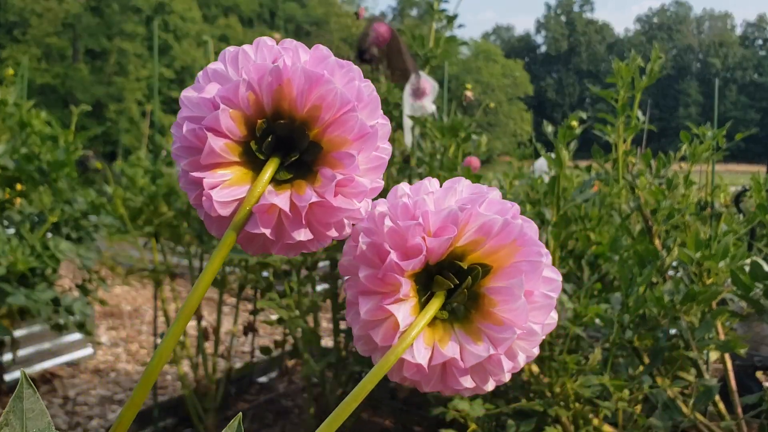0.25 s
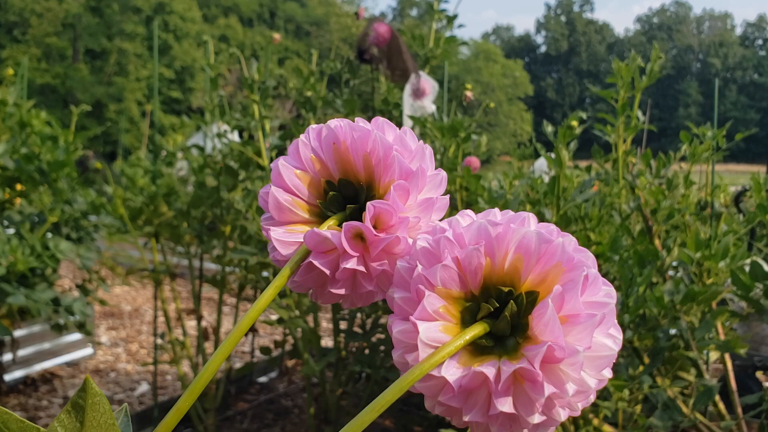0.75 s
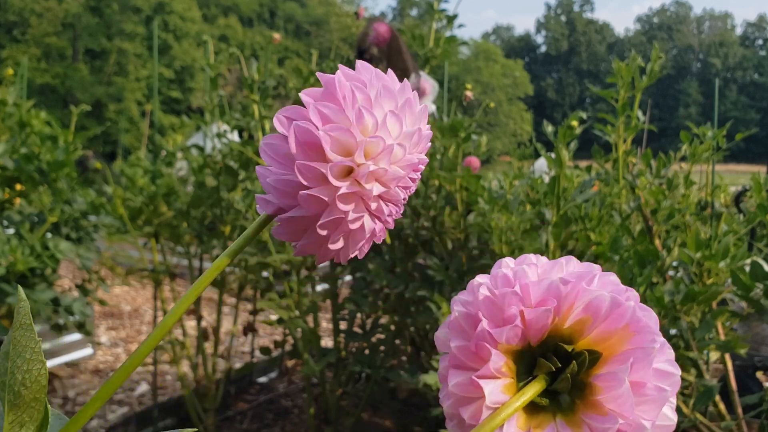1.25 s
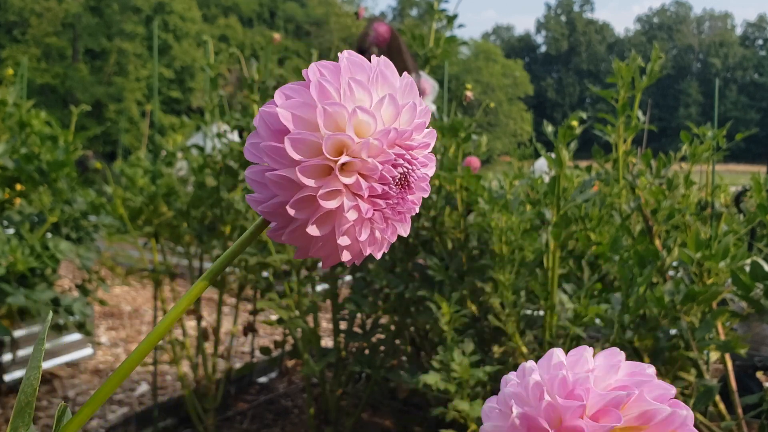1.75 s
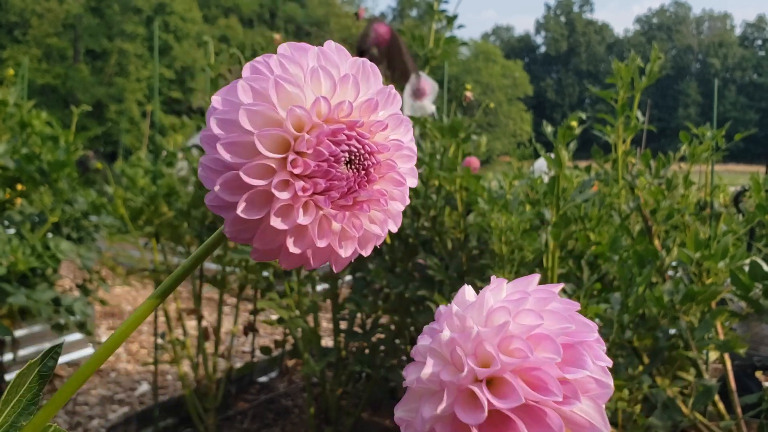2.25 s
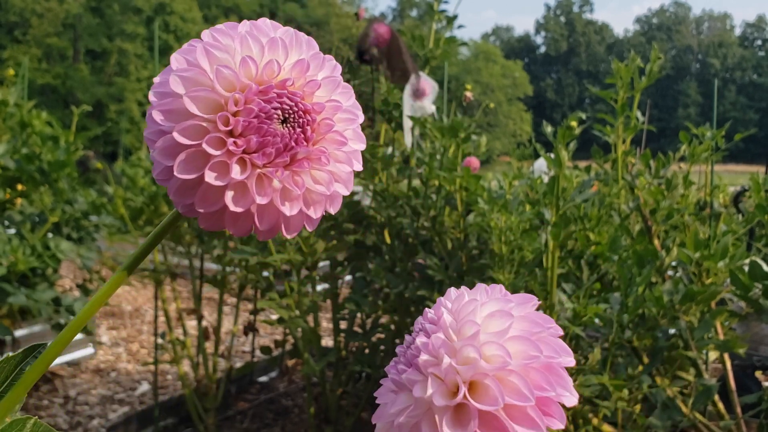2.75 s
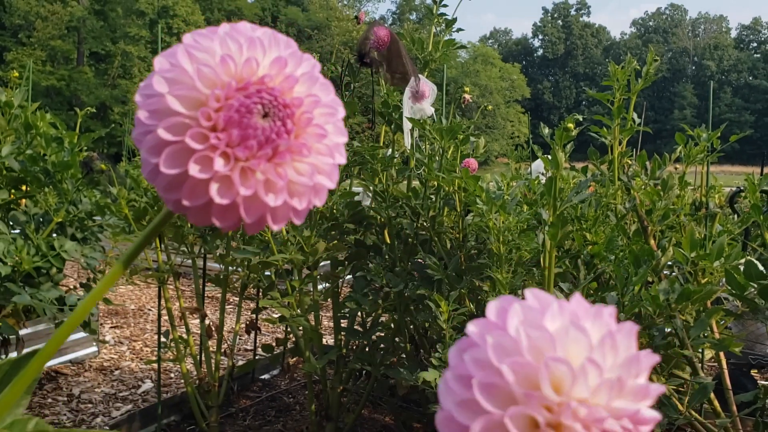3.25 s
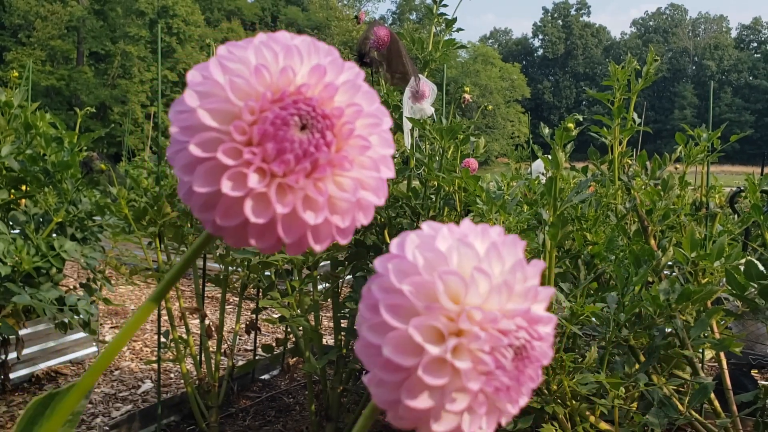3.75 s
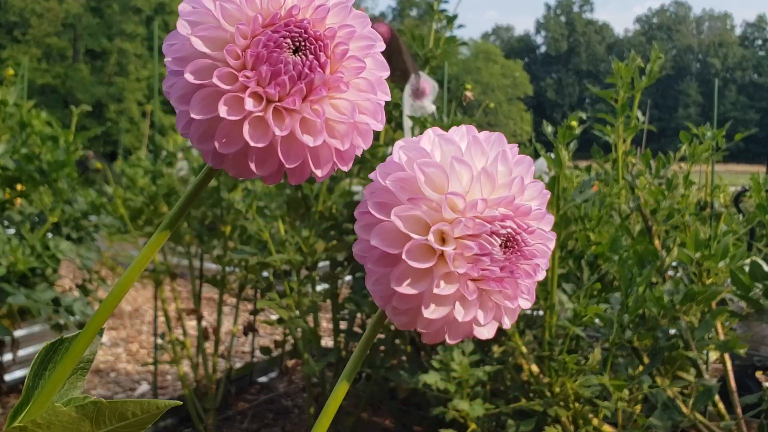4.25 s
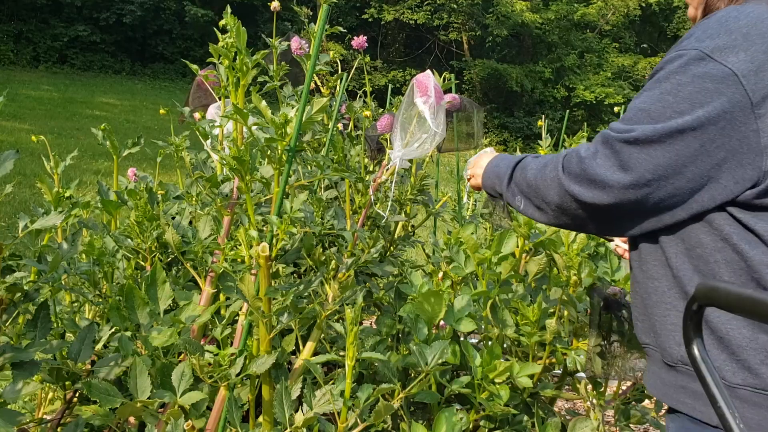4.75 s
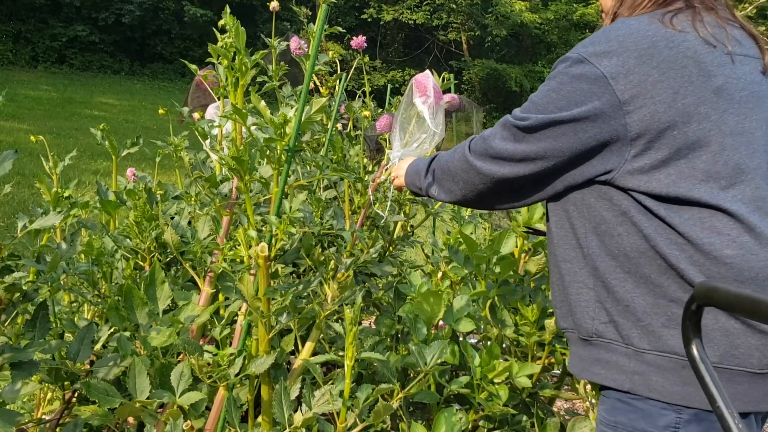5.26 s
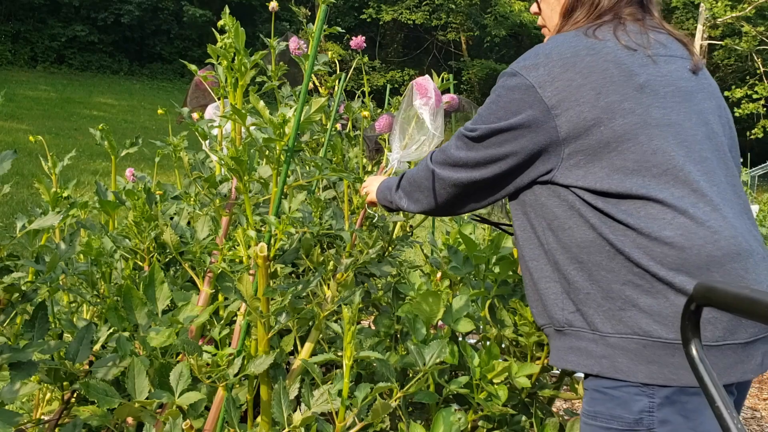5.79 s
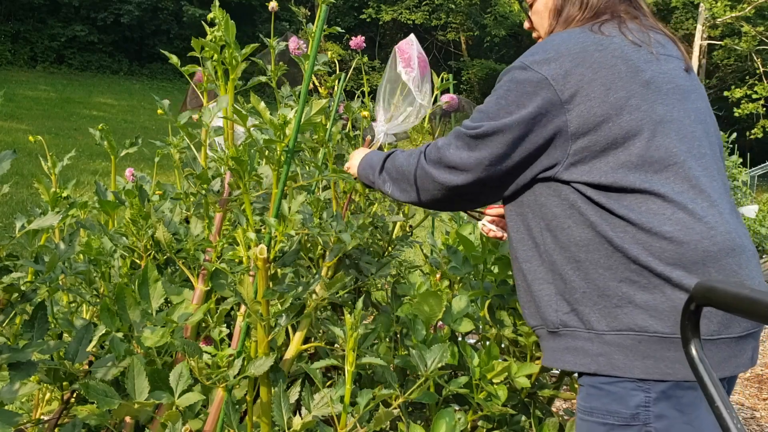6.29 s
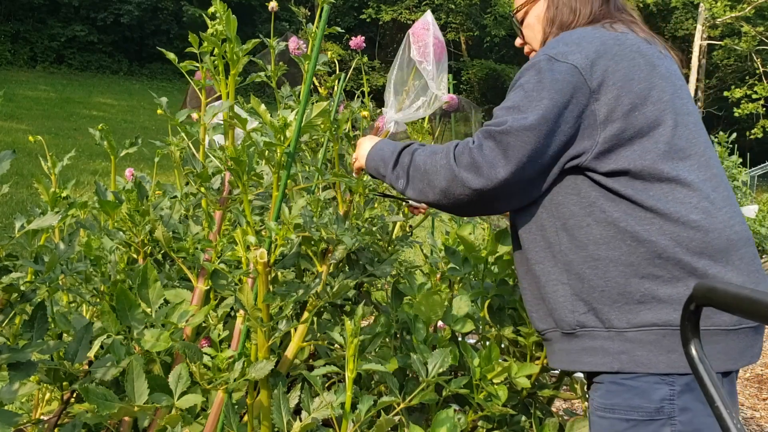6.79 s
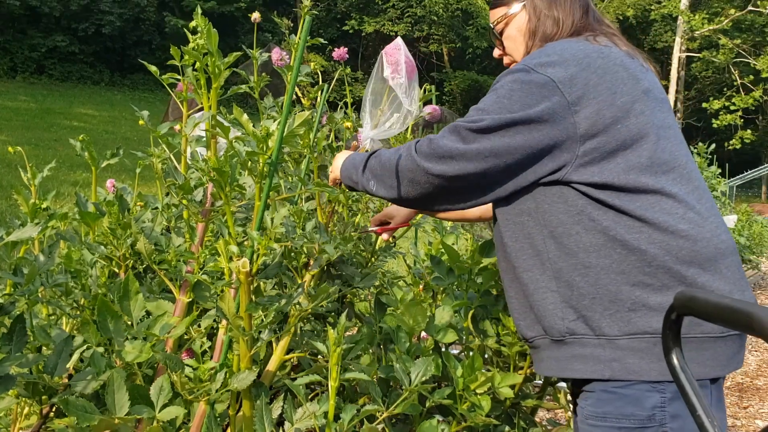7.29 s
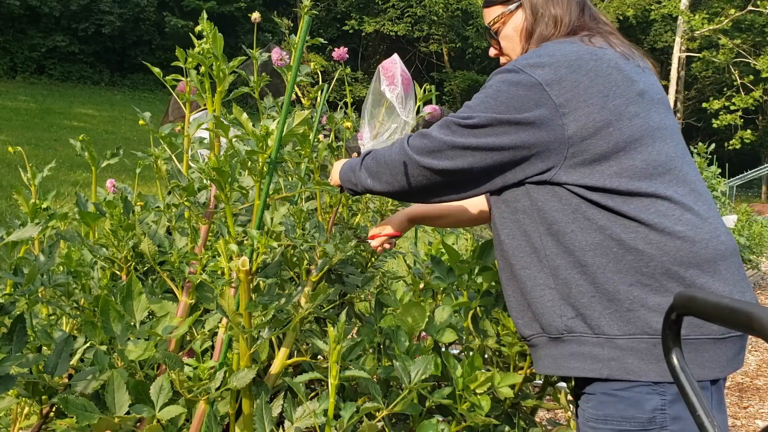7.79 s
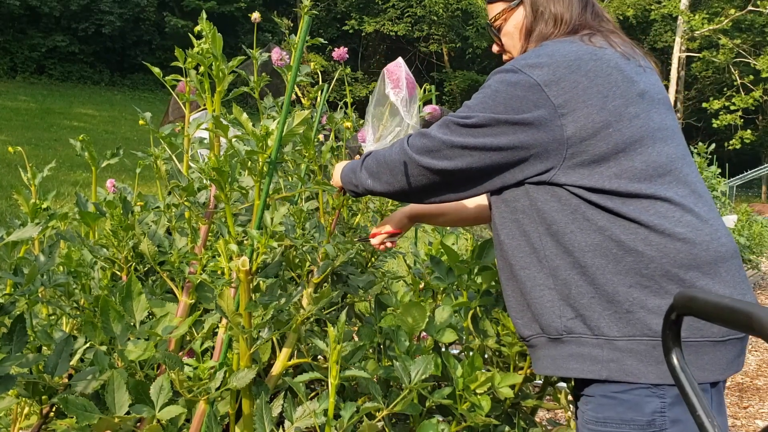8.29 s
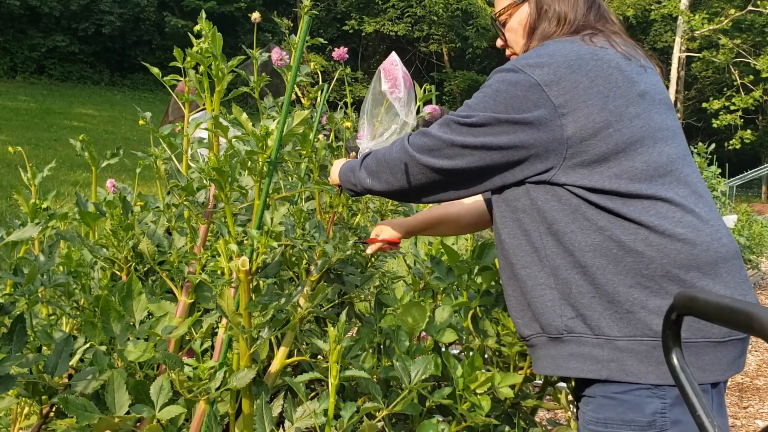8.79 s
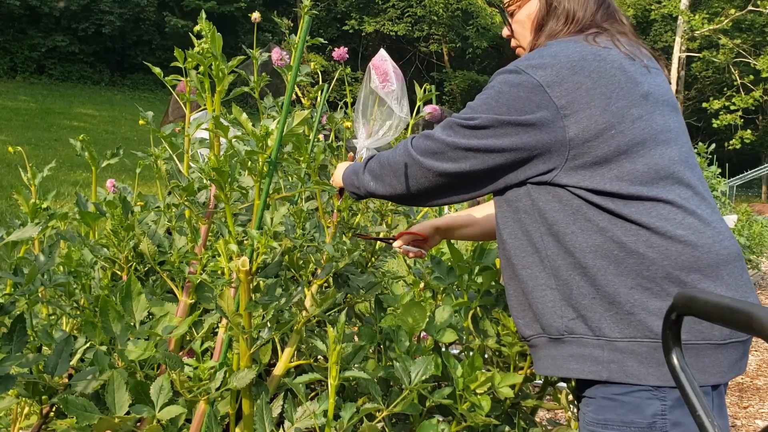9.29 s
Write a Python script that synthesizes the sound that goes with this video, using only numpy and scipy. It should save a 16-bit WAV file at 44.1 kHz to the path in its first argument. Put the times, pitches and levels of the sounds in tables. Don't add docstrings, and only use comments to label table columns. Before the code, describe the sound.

Summer garden insects trill and hiss above distant traffic; the scene shifts midway, and near the end shears cut a stem with a sharp metallic snap.

```python
import sys
import numpy as np
from scipy import signal
from scipy.fft import rfft, irfft
from scipy.io import wavfile
from scipy.ndimage import uniform_filter1d

SR = 44100
rng = np.random.default_rng(int(sys.argv[2]) if len(sys.argv) > 2 else 0)


def master(y):
    cut = np.clip(np.atleast_2d(y).T, -1, 1)
    pcm = np.round(cut * 32767)
    wavfile.write(sys.argv[1], SR, pcm.astype(np.int16))


def boost(x):
    u = np.asarray(x, float) / 20
    return 10 ** u


N = 420713
T = np.arange(N) / SR


def track(rows):
    s, *columns = np.transpose(rows)
    curves = [np.interp(T, s, c) for c in columns]
    gate = np.clip(np.minimum(T - s[0], s[-1] - T) / 0.064 + 1, 0, 1)
    return curves, gate


def on_hz(points, hz):
    f, db = np.transpose(points)
    return np.interp(np.log(hz + 1e-9), np.log(f), db)


def walk(rate):
    k = int(SR / rate)
    held = np.repeat(rng.standard_normal(N // k + 1), k)
    return 1.3 * uniform_filter1d(uniform_filter1d(held, k), k)[:N]


def colour(x, points, side=((1, 0), (2, 0)), lean=((1, 0), (2, 0))):
    hz = np.fft.rfftfreq(x.shape[1], 1 / SR)
    inside = (hz > points[0][0]) * (hz < points[-1][0])
    gain = boost(on_hz(points, hz)) * inside
    mid, sid = rfft(x) * [gain, gain * boost(on_hz(side, hz))]
    tilt = boost(on_hz(lean, hz) / 2)
    stereo = irfft([(mid + sid) * tilt, (mid - sid) / tilt], x.shape[1])
    return stereo / irfft(mid, x.shape[1]).std()


def noise():
    return rng.standard_normal((2, N))


def lean_gain(db):
    return boost(np.array([[db], [-db]]) / 2)


# f/Hz, level/dB (per Hz)
RUMBLE = [
    [(12, -60), (20, -4), (25, -14), (35, -2.5), (70, 0.5), (88, 0), (155, -12), (193, -14.5), (244, -33),
     (260, -27.5), (340, -53), (570, -120)],
    [(12, -55), (20, -25), (54, -0.5), (102, -4), (134, -4.5), (146, -4), (167, -13), (197, -16),
     (239, -30), (260, -18), (340, -34), (570, -120)],
]
DRONE = [
    [(120, -35), (200, -3), (243, -7.5), (327, -9.5), (399, -19), (620, -22.5), (810, -50), (1360, -120)],
    [(120, -29), (200, 2.5), (243, -13.5), (394, -2.5), (499, -3.5), (620, -6.5), (810, -45), (1360, -120)],
]
ROAD = [
    [(360, -38), (620, -14), (769, -2), (1000, -2), (1500, -5.5), (2100, -14), (2600, -23), (3380, -26),
     (5720, -120)],
    [(360, -25), (620, 0), (932, -1.5), (1600, -15), (1760, -16.5), (1960, -24.5), (2210, -22.5),
     (2600, -31.5), (3380, -33), (5720, -120)],
]
LOW_INSECTS = [
    [(1350, -67), (2300, -57), (2820, -22), (3190, -15), (3500, -3), (4500, 3), (5850, -9.5), (9900, -120)],
    [(1350, 0), (2300, 1), (2540, -12.5), (3140, -11.5), (3690, -1), (4500, 4), (5850, -31), (9900, -120)],
]
CROWD = [
    [(2470, -34.5), (4200, -8), (4770, 1.5), (5180, -0.5), (5610, 0.5), (5870, 1), (7660, -8),
     (8260, -31.5), (9200, -26.5), (12000, -38), (20200, -120)],
    [(3700, -56), (4050, -33), (4400, -4.5), (4880, 3.5), (5350, -2), (5990, -0.5), (7900, -8), (8200, -30),
     (8350, -30), (8500, -56)],
]
KATYDIDS = [
    [(5060, -32), (8600, -24), (9440, 0), (11000, -3.5), (12000, 0), (14200, 0.5), (15200, 5), (16000, 7)],
    [(8800, -17), (9550, -25), (9750, -6), (10100, -7), (14000, -0.5), (15100, 5.5), (16000, 3)],
]
# f/Hz, level/dB (side minus mid)
SIDE_DB = [
    [(60, -21), (110, -18.5), (200, -15), (380, -5.5), (700, 0), (1290, 0.5), (2380, -14.5), (4400, 2.5),
     (8120, -0.5), (15000, -0.5)],
    [(60, -25.5), (200, -15.5), (380, -10.5), (700, -3.5), (1290, 0.5), (15000, -0.5)],
]
# f/Hz, level/dB (left minus right)
LEAN_DB = [
    [(60, 0), (380, 2.5), (700, -1), (1300, 2.5), (4400, -2), (7600, 10), (8400, 39.5), (9400, 16.5),
     (10500, 10), (15000, -8)],
    [(60, 0.5), (700, .5), (2400, 2.5), (6000, 1), (7700, 10.5), (8300, 15), (9700, 6.5), (15000, -0.5)],
]
# t/s, level/dB
TRAFFIC = [
    [(0, -1.5), (.6, 0), (1.5, -0.5), (2.2, 1.5), (3.3, 1), (4.74, 2)],
    [(4.79, 3), (5.6, 1.5), (6.7, 0.5), (7.4, -0.5), (7.95, -1), (8.5, -2.5), (9.0, -4), (9.54, -5)],
]
# t/s, level/dB
CHORUS = [
    [(0, 3.5), (.7, 3), (1.5, 1.5), (2.8, -1.5), (4.74, -3.5)],
    [(4.79, 4), (5.3, 1), (6.5, -0.5), (7.6, -2.5), (8.2, -1.5), (9.54, -.6)],
]
# level/dB (mean), dB per dB of the driver
LAYERS = [
    [(-51, 1.6), (-68, 0.55), (-62, 1.26), (-64, 1.22), (-54.5, 0.85), (-72.5, 0.8)],
    [(-49.5, .5), (-57.5, 1.54), (-55, 1.03), (-69, 1.83), (-61.5, 0.88), (-74.5, 1)],
]
# left lag [samples], level/dB (side trim)
ROAD_SIDE = [
    (-12, -3),
    (4, -1.5),
]


def air(spot):
    flicker_db, flicker_hz = (1.5, 1.2, .8, 1.1, .8, .8), (6, 5, 8, 14, 30, 25)
    (traffic,), _ = track(TRAFFIC[spot])
    (chorus,), _ = track(CHORUS[spot])
    hush = -10.5 * np.clip((T - 6.7) / .15 + .5, 0, 1)
    car = 3.5 * np.exp(-((T - 8.0) / .3) ** 2)
    out = 0
    for k, points in enumerate((RUMBLE, DRONE, ROAD, LOW_INSECTS, CROWD, KATYDIDS)):
        lag, trim_db = ROAD_SIDE[spot] if points is ROAD else (0, 0)
        source = noise() * [[1], [boost(trim_db)]]
        bed = colour(source, points[spot], SIDE_DB[spot], LEAN_DB[spot])
        bed[0] = np.roll(bed[0], lag)
        mean_db, share = LAYERS[spot][k]
        db = mean_db + share * (traffic if k < 3 else chorus)
        if points is LOW_INSECTS:
            db = db + hush
        if points is ROAD:
            db = db + car
        out = out + bed * boost(db + flicker_db[k] * walk(flicker_hz[k]))
    return out


def tone(rows, wander, rate, flutter_db, trim_db):
    (hz, db), gate = track(rows)
    level = gate * boost(db + trim_db + flutter_db * walk(rate))
    pitch = hz * (1 + wander * walk(rate))
    return level * np.sin(2 * np.pi * np.cumsum(pitch) / SR)


# t/s, f/Hz, level/dB
HUM = [
    [(2.85, 78.8, -61), (3.45, 77.4, -40), (3.65, 76.35, -51.5), (4.6, 73.5, -48.5), (4.74, 74, -60)],
    [(4.79, 136.7, -46), (5.2, 134.5, -46), (5.9, 134.3, -50.5), (6.6, 135.7, -59.5), (7.5, 131.7, -57),
     (8.0, 133.9, -64), (8.5, 135.1, -56), (9.15, 136, -46), (9.54, 138, -72)],
]


def engine_hum(spot):
    if spot == 0:
        return tone(HUM[0], wander=.0264, rate=7.3, flutter_db=2.9, trim_db=-1.0)
    return tone(HUM[1], wander=.0295, rate=9, flutter_db=5.0, trim_db=-1.2)


# t/s, f/Hz, level/dB
WHINE = [
    (4.79, 2220, -79),
    (5.29, 2225, -63.5),
    (5.318, 2150, -73),
    (6.294, 2147, -66.5),
    (6.5, 2140, -79),
]


def tyre_whine():
    return sum(tone(WHINE, wander=.014, rate=260, flutter_db=1.3, trim_db=-6.5) for _ in range(3))


# t/s, f/Hz, level/dB
BIRD = [
    (1.31, 2510, -80),
    (1.36, 2540, -75),
    (1.42, 2545, -72),
    (1.445, 2550, -84),
    (1.47, 2560, -71),
    (1.52, 2530, -80),
]


def bird():
    return tone(BIRD, wander=.003, rate=40.2, flutter_db=1.5, trim_db=0)


def cracks(events):
    out = 0
    for s, db, t60 in events:
        attack = np.clip((T - s) / 0.00047, 0, 1)
        out = out + attack * boost(db - 60 * np.maximum(T - s, 0) / t60)
    return out


# t/s, level/dB (peak), t60 [s]
LEAF = [
    (1.088, -56, .06),
    (3.125, -62, .04),
]
# f/Hz, level/dB (per Hz)
LEAF_COLOUR = [(6000, -30), (9000, 0), (12000, -1), (15500, -12)]


def leaf_ticks():
    return cracks(LEAF) * colour(noise(), LEAF_COLOUR)


STROKES = {"near": (.0162, .0107, 5340, 4720, 0, 1.35, 1.82),
           "far": (.0165, .0112, 5255, 4590, .22, 1.8, -13.35), "high": (.0389, .021, 8170, 7750, .4, 1, 0),
           "low": (.0387, .022, 7600, 7200, .35, 1, 0), "faint": (.0168, .007, 4900, 4550, 0, 1.2, 1),
           "faint high": (.039, .02, 7750, 7500, .3, 1, 0)}


def cricket(bouts, stroke, place):
    period, length, top_hz, end_hz, top, late, lag = STROKES[stroke]
    trim_db, lean_db = place
    u = np.arange(int(length * SR)) / (length * SR)
    swell = np.sin(np.pi * u ** late) ** .85
    glide = top_hz + (end_hz - top_hz) * np.abs((u - top) / (1 - top)) ** 2.8
    turn = np.pi * lag * glide / SR * np.array([[-1], [1]])
    peak_s = .5 ** (1 / late) * length
    out = np.zeros((2, N + SR))
    for first, last, db in bouts:
        times = np.linspace(first, last, round((last - first) / period) + 1)
        for t, (a, b, c, d) in zip(times, rng.standard_normal((len(times), 4))):
            phase = 2 * np.pi * np.cumsum(glide * (1 + .004 * a)) / SR + 3 * d
            k = max(int((t + .0005 * b - peak_s) * SR), 0)
            out[:, k:k + len(u)] += boost(db + trim_db + .9 * c) * swell * np.sin(phase + turn)
    n = np.arange(int(.08 * SR))
    decay = boost(-60 * n / SR / .09) * (n > .002 * SR)
    scatter = rng.standard_normal((2, len(n))) * decay
    scatter /= np.linalg.norm(scatter, axis=1, keepdims=True)
    out += boost(-16) * signal.fftconvolve(out, scatter, axes=1)[:, :out.shape[1]]
    return out[:, :N] * lean_gain(lean_db)


# first stroke t/s, last stroke t/s, level/dB
TRILL_FAINT = [
    (.012, 4.03, -64),
    (4.056, 4.072, -54),
    (4.092, 4.213, -58),
    (4.24, 4.36, -68),
    (4.383, 4.456, -60),
    (4.479, 4.75, -66),
]
TICKER_FAINT = [
    (.02, 4.74, -85),
]
# level/dB (trim), level/dB (left minus right)
FAINT = (2.3, 0.61)
FAINT_HIGH = (0.58, 18)


def faint_singers():
    return cricket(TRILL_FAINT, "faint", FAINT) + cricket(TICKER_FAINT, "faint high", FAINT_HIGH)


# first stroke t/s, last stroke t/s, level/dB
TICKER_HIGH = [
    (4.766, 7.95, -70.5),
]
TICKER_LOW = [
    (4.791, 6.496, -72),
    (7.143, 7.492, -77),
    (7.53, 9.532, -71),
]
# level/dB (trim), level/dB (left minus right)
HIGH = (-3.5, 27)
LOW = (6.5, 14)


def ground_crickets():
    return cricket(TICKER_HIGH, "high", HIGH) + cricket(TICKER_LOW, "low", LOW)


# t/s, level/dB
SCRAPE = [
    (8.655, -78),
    (8.695, -61),
    (8.712, -49),
    (8.733, -41),
    (8.75, -51.5),
    (8.787, -53),
    (8.805, -62.5),
    (8.85, -66),
    (8.88, -64),
]
# t/s, level/dB (peak)
CRACKS = [(8.664, -43), (8.693, -45), (8.703, -42), (8.709, -43), (8.718, -39), (8.726, -37), (8.731, -36),
          (8.735, -39), (8.741, -41), (8.756, -47), (8.775, -39), (8.783, -37)]
# t/s, level/dB (peak)
CLOSING = [
    (8.815, -36),
    (8.817, -33.5),
    (8.8244, -34.5),
    (8.8285, -46),
    (8.843, -52),
]
# t/s, level/dB (peak), t60 [s]
SHUT = [
    (8.8208, -17.5, .006),
    (8.8222, -18.5, .008),
]
# f/Hz, level/dB
RING = [
    (6740, -3),
    (7200, -4),
    (13800, -10),
    (4300, -22),
]
# f/Hz, level/dB (per Hz)
BLADES = [(530, -35), (900, -5.5), (1410, -26), (1660, -3), (2040, -16), (2300, -8), (2630, -7.5),
          (3550, -5), (5040, -6), (6410, 4.5), (7960, -5), (8550, -5.5), (16000, -0.5)]
STEM = [(710, -42), (1200, -8.5), (2400, -6.5), (2620, -6), (3660, -7), (5530, 0.5), (6440, -6),
        (7250, 0.5), (8440, -14), (9820, -7), (16000, -16)]


def shears():
    (press_db,), gate = track(SCRAPE)
    grit = noise() * boost(3.0 * walk(400))
    tear = gate * boost(press_db) * colour(grit, STEM)
    steel = colour(noise(), BLADES)
    ring = 0
    for hz, db in RING:
        ring = ring + boost(db) * np.sin(2 * np.pi * hz * T + rng.uniform(0, 2 * np.pi, (2, 1)))
    breaks = cracks([(s, db, .016) for s, db in CRACKS])
    breaks = breaks + cracks([(s, db, .034) for s, db in CLOSING])
    snap = breaks * steel * boost(-4) + cracks(SHUT) * (ring * boost(-4) + steel * boost(-9))
    return (tear + snap) * lean_gain(3)


NEAR_EARLY = [.007, .128, .185, .247, .422, .660, .766, .939, 1.095, 1.155, 1.294, 1.386, 1.543, 1.650,
              1.755, 2.006, 2.066, 2.125, 2.251, 2.376]
NEAR_LATE = [2.449, 2.557, 2.696, 2.753, 2.810, 2.997, 3.073, 3.212, 3.351, 3.444, 3.584, 3.676, 3.752,
             3.824, 3.893, 4.251, 4.530, 4.652, 4.737]
FAR_EARLY = [4.801, 5.011, 5.169, 5.243, 5.335, 5.394, 5.566, 5.810, 5.892, 5.973, 6.080, 6.210, 6.291,
             6.372, 6.563, 6.628, 6.725, 6.869, 6.962, 7.072, 7.166, 7.246, 7.391, 7.476]
FAR_LATE = [7.798, 7.891, 7.946, 8.101, 8.289, 8.394, 8.483, 8.610, 8.688, 8.768, 8.812, 8.873, 9.130,
            9.363, 9.442, 9.520]
NEAR_STOPS = [4.022, 4.330, 4.752]
FAR_STOPS = [7.479, 9.535]
# t/s, level/dB
NEAR_EFFORT = [
    (0, -34.5),
    (1.3, -35.5),
    (2.3, -36.5),
    (3.2, -35),
    (4.75, -36.5),
]
FAR_EFFORT = [
    (4.8, -45.5),
    (6.6, -44.2),
    (9.5, -43.5),
]
# level/dB (trim), level/dB (left minus right)
NEAR = (-3, -3.8)
FAR = (0, 3.2)


def phrases(starts, stops, pause_s, effort):
    first, stops = np.array(starts), np.array(stops)
    next_pause = np.append(first[1:] - pause_s, np.inf)
    last = np.minimum(next_pause, stops[np.searchsorted(stops, first)])
    return zip(first, last, np.interp(first, *np.transpose(effort)))


def tree_cricket():
    near = phrases(NEAR_EARLY + NEAR_LATE, NEAR_STOPS, .027, NEAR_EFFORT)
    far = phrases(FAR_EARLY + FAR_LATE, FAR_STOPS, .028, FAR_EFFORT)
    return cricket(near, "near", NEAR) + cricket(far, "far", FAR)


def scene():
    move_s, fade_s = 4.763, .018
    late = np.clip((T - move_s) / fade_s + .5, 0, 1)
    first = air(0) + engine_hum(0) + bird() + faint_singers()
    second = air(1) + engine_hum(1) + tyre_whine() + ground_crickets()
    background = first * np.sqrt(1 - late) + second * np.sqrt(late)
    return background + leaf_ticks() + shears() + tree_cricket()


def band_limit(x):
    return signal.sosfilt(signal.butter(12, 15780, fs=SR, output="sos"), x)


def record(dry):
    high_pass = signal.butter(N=4, Wn=42, btype="high", fs=SR, output="sos")
    return band_limit(signal.sosfilt(high_pass, dry))


dry = scene()
out = record(dry)
master(out)
```